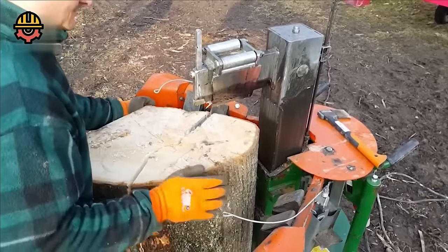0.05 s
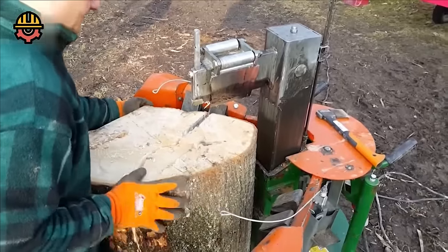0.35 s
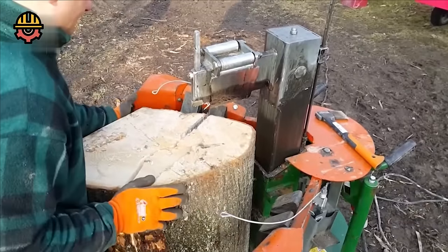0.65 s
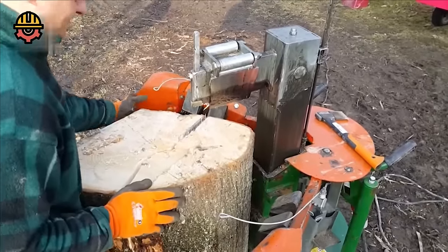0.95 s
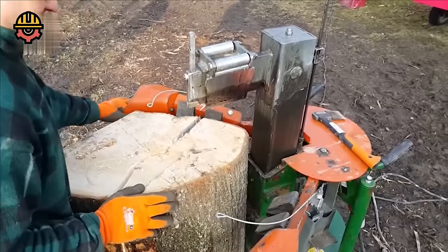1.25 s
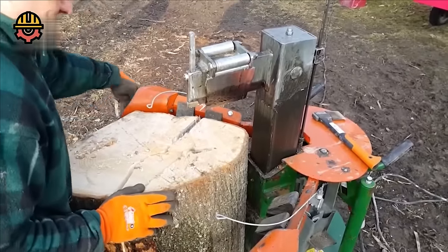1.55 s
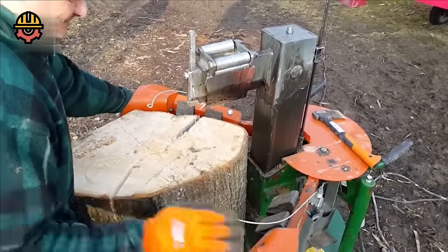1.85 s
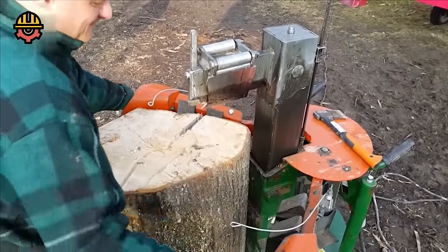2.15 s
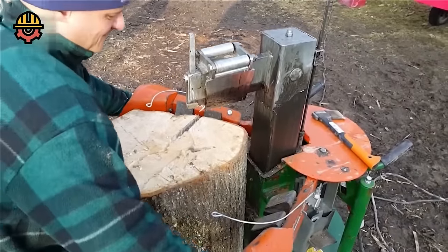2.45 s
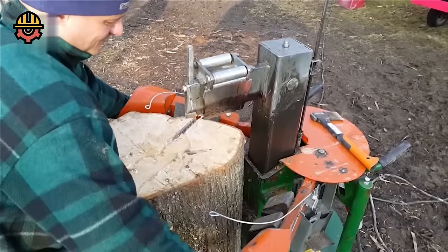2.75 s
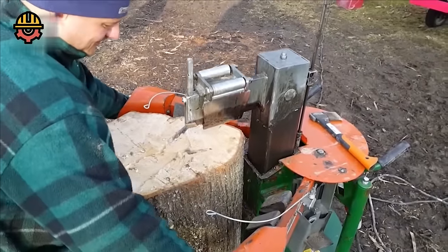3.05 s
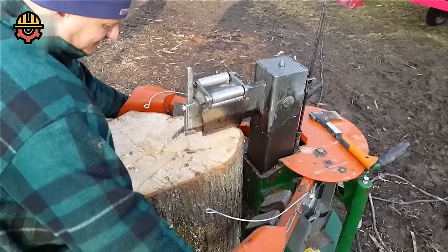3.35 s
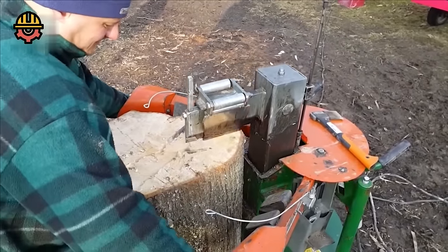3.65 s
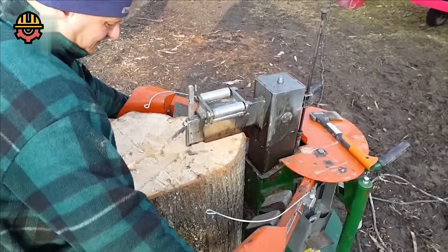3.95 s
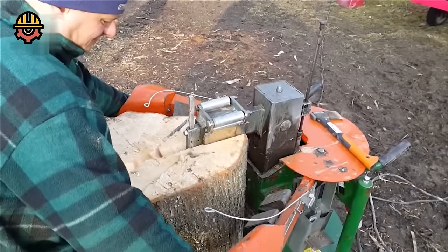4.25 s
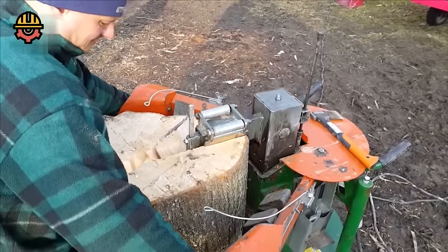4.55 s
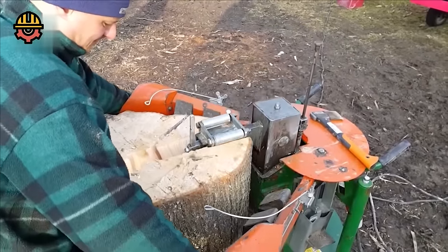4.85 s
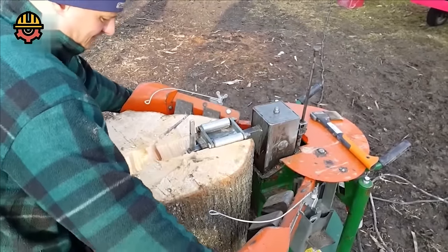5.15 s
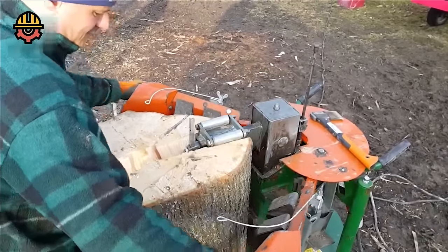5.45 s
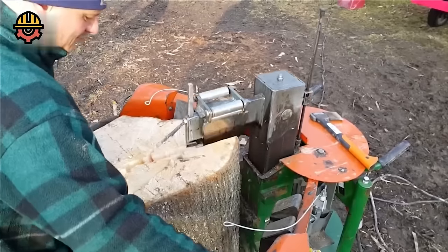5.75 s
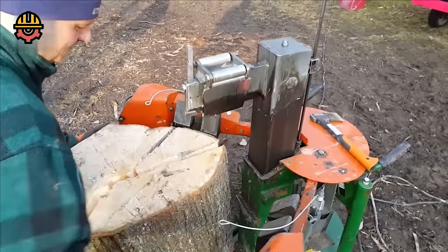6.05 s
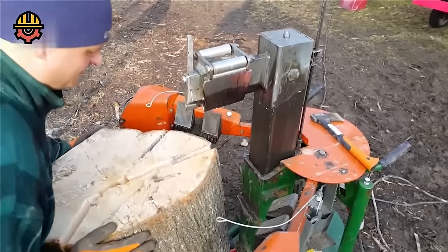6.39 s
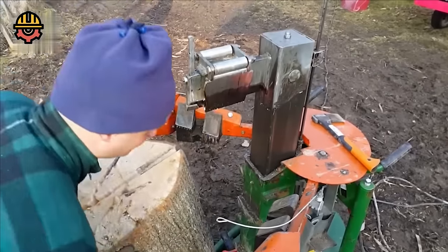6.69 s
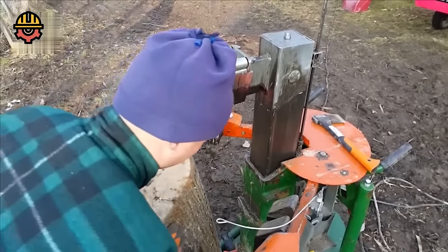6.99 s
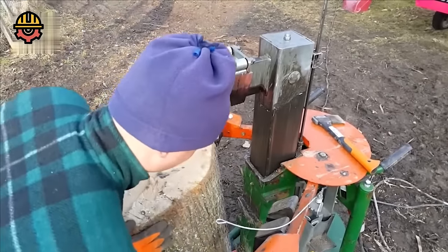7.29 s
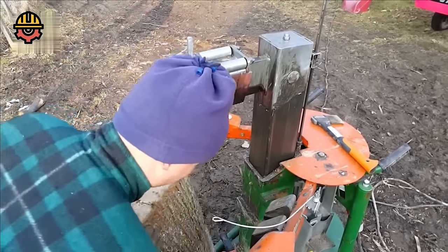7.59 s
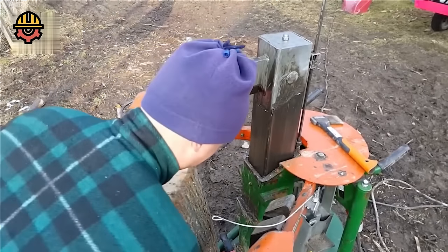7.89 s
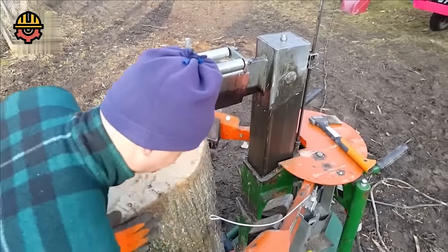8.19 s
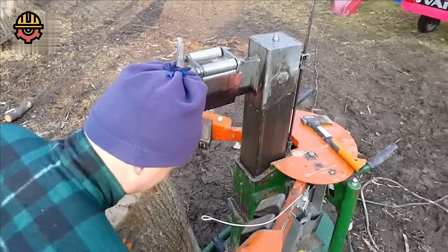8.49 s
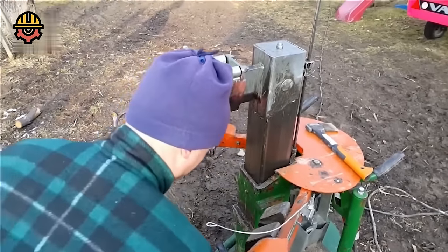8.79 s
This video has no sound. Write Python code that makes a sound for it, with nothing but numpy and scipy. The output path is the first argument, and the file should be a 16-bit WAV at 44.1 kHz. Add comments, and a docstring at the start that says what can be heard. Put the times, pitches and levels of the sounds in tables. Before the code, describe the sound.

A hydraulic log splitter runs close by outdoors, with a steady pump whine, gear rattle, motor hum and hiss of oil. A thin, high whistle fades over the first two seconds, and steel clanks at about 1.2 seconds. At 2.3 seconds the blade bumps onto a big log, which gives a sharp crack at 2.6. At 3.7 a hard clank starts the split: the pump dips in pitch, fibres tear and the wood breaks in a loud, dense run of cracks, strongest around 4 to 4.5 seconds, thinning to single snaps until 5.1. At 5.5 the ram jerks back up with a cluster of clanks, sizzling oil and a cleaner, lower whine. More clanks follow from 6.1 to 6.4. The pump then idles until the end at about 9 seconds, with one light knock at 7.4. There is very little echo.

```python
"""A hydraulic log splitter idles outdoors: its gear pump whines and rattles, its motor hums, its oil hisses.
An oil whistle fades and steel clanks. At 2.3 s the blade bumps onto a big log, which starts to crack.
From 3.7 s the blade forces the log open: the pump slows, fibres tear and the wood cracks apart.
At 5.5 s the ram that pushes the blade jerks back up, with clanks, sizzling oil and a clean, lower whine.
From 6.4 s the pump idles again, with one last knock."""
import sys
import numpy as np
from scipy import signal
from scipy.fft import rfft, irfft, next_fast_len
from scipy.io import wavfile
from scipy.ndimage import uniform_filter1d, map_coordinates

SR = 44100
rng = np.random.default_rng(int(sys.argv[2]) if len(sys.argv) > 2 else 0)


def dump(signal):
    """Clip the signal to [-1, 1] and save it as 16-bit WAV at the path in sys.argv[1]."""
    limited = np.clip(np.atleast_2d(signal).T, -1, 1)
    pcm = np.round(limited * 32767).astype(np.int16)
    wavfile.write(sys.argv[1], SR, pcm)


N = 398223
TOP_HZ = 16000


def amp(db):
    """Turn decibels into a number to multiply by."""
    return 10 ** (np.asarray(db) / 20)


def unit(x):
    """Scale a sound to an average (rms) strength of 1."""
    return x / np.sqrt(np.mean(x ** 2) + 1e-20)


def along(points, hz):
    """Read between the rows of a (frequency, value) table, on a pitch scale."""
    f, values = np.transpose(points)
    return np.interp(np.log(hz + 1), np.log(f + 1), values)


def curves(rows):
    """Join the rows of a timetable with straight lines: one curve per column after the time."""
    times, *columns = np.transpose(rows)
    return [np.interp(np.arange(N) / SR, times, column) for column in columns]


def wobble(rate):
    """A smooth curve through `rate` random points a second."""
    points = rng.standard_normal(int(N * rate / SR) + 4)
    coarse = np.arange(0, N, 64)
    return np.interp(np.arange(N), coarse, map_coordinates(points, [coarse * rate / SR]))


def filtered(x, response):
    """Multiply each frequency in a sound by response(hz)."""
    size = next_fast_len(N + SR // 2)
    return irfft(rfft(x, size) * response(np.fft.rfftfreq(size, 1 / SR)), size)[..., :N]


def coloured(x, colour, size=4096):
    """Give a sound a colour: a table of how strong its low and high frequencies are."""
    gains = amp(along(colour, np.fft.rfftfreq(size, 1 / SR)))
    cepstrum = irfft(np.log(np.maximum(gains, 1e-6)))
    # folding this makes the filter ring after a hit, never before it
    cepstrum[1:size // 2] *= 2
    cepstrum[size // 2 + 1:] = 0
    impulse = irfft(np.exp(rfft(cepstrum)))
    return signal.oaconvolve(x, impulse[None] / np.linalg.norm(impulse), axes=1)[:, :N]


# how alike the two ears are: f/Hz, likeness (1 or more is the same, 0 or less is unrelated)
EAR_LIKENESS = [(60, 3), (130, 1.5), (290, 2.5), (640, 10), (1410, 0.5), (3100, 0.35), (6820, -0.25),
                (15000, -3.8)]
def spread(pair):
    """Two unrelated sounds become left and right: alike in the bass, apart in the treble."""
    angle = lambda hz: np.arccos(np.clip(along(EAR_LIKENESS, hz), 0, 1)) / 2
    mid, side = filtered(pair, lambda hz: np.array([np.cos(angle(hz)), np.sin(angle(hz))]))
    return np.array([mid + side, mid - side])


def rush(colour):
    """Steady stereo noise of strength 1."""
    return unit(spread(coloured(rng.standard_normal((2, N)), colour)))


def add(track, start_s, sound):
    """Mix a sound into a track."""
    part = track[..., round(start_s * SR):][..., :sound.shape[-1]]
    part += sound[..., :part.shape[-1]]


def tone(phase, hz, waver_db, drift):
    """A wavering tone; higher ones flutter faster and differ more between the ears."""
    apart = rng.uniform(-1, 1) * min(hz / 12000, .6)
    start = rng.uniform(-np.pi, np.pi) * min(1, (hz / 1480) ** 2)
    phase = phase + drift * wobble(5 + hz * hz / 3e6) + start
    level = np.sqrt(2) * amp(waver_db * (.2 * wobble(2) + .8 * wobble(11 + hz / 200)))
    return level * np.sin((phase % (2 * np.pi) + np.array([[apart], [-apart]])).astype(np.float32))


# the oil valve's steps: start t/s, end t/s, position, whine's octave level/dB, rattle level/dB
VALVE_STEPS = [(-.2, 2.37, "ready", -39, -42.8), (2.38, 5.12, "down", -45.5, -48.5),
               (5.12, 5.92, "down", -49.5, -54.5), (5.56, 6.29, "up", -48, -74),
               (6.44, 9.3, "rest", -40.5, -48)]
def valve_cycle(switch_s=0.094):
    """The valve glides between positions: each one's share over time, then the octave and rattle gains."""
    t = np.arange(N) / SR
    valve = {name: np.zeros(N) for name in ("ready", "down", "up", "rest")}
    octave, rattle = np.zeros((2, N))
    for start, end, position, octave_db, rattle_db in VALVE_STEPS:
        share = np.clip(.5 + np.minimum(t - start, end - t) / switch_s, 0, 1)
        valve[position] += share
        octave += amp(octave_db) * share
        rattle += amp(rattle_db) * share
    return valve, octave, rattle


# how often the gear teeth meet, less often under load: t/s, f/Hz
TOOTH_RATE = [(0, 448.1), (2.3, 448.1), (2.45, 448.9), (3.7, 448.9), (3.92, 439.6), (4.15, 437),
              (4.35, 447.5), (5.52, 449), (5.72, 432.8), (6.22, 432), (6.42, 448.3)]
TEETH, IDLE_HZ = 12, TOOTH_RATE[0][1]
# the whine's lowest tone: t/s, level/dB
WHINE_LEVEL = [(0, -41.5), (1.2, -41.5), (1.79, -40), (1.85, -47), (1.9, -39), (2.3, -40.5), (2.39, -55),
               (2.47, -45), (2.66, -42), (2.85, -52), (3.6, -43.5), (4.1, -47), (4.4, -45.5), (4.62, -43),
               (4.75, -58), (5.4, -44.5), (5.7, -41.5), (5.9, -43.5), (6.2, -42.5), (6.42, -55), (6.7, -48),
               (7.2, -45), (7.32, -49), (7.5, -45), (7.86, -46), (7.93, -38.5), (8.15, -45), (8.2, -38.5),
               (8.43, -46), (8.5, -40), (8.7, -43), (9.03, -43.5)]
def pump_whine(tooth_phase, tooth_hz, octave_gain, harden_db_per_hz=0.51):
    """Meeting teeth make a tone and its octave (twice as high), which grows as load slows the pump."""
    lowest = amp(curves(WHINE_LEVEL)[0]) * tone(tooth_phase, IDLE_HZ, 1.0, 0.06)
    hardening = amp(harden_db_per_hz * (IDLE_HZ - tooth_hz))
    return lowest + octave_gain * hardening * tone(2 * tooth_phase, 2 * IDLE_HZ, 1.0, 0.067)


# the whine's higher tones: multiple of the tooth rate -> level/dB for ready, down, up, rest
WHINE_OVERTONES = {3: (-7, -12, -10, -10), 4: (-14, -15, -9, -17), 5: (-15, -22, -15, -17),
                   6: (-23, -26, -12, -23), 8: (-22, -25, -11, -22), 9: (-17, -21, -7, -12.5),
                   10: (-21, -21, -15, -19), 11: (-22, -18, -28, -15), 12: (-10, -10, -26, -13),
                   13: (-22, -26, -10, -12), 14: (-19, -14, -26, -19), 15: (-21, -25, -29, -21),
                   17: (-16.5, -21, -30, -16.5)}
def pump_overtones(tooth_phase, valve):
    """The teeth also make higher tones, whose mix changes as the valve switches."""
    sound = np.zeros((2, N))
    for k, levels_db in WHINE_OVERTONES.items():
        level = sum(share * amp(db) for share, db in zip(valve.values(), levels_db))
        sound += level * tone(k * tooth_phase, k * IDLE_HZ, waver_db=1.6, drift=.0018 * k * k)
    return sound


# the rattle's strong tones: multiple of the shaft's turning rate, level/dB for ready, down, rest
RATTLE_TONES = [(9, -15, -17, -10), (10, -29, -26, -12), (22, -12, -16, -6), (23, -25, -21, -10),
                (25, -13, -23, -12), (26, 1, 0, 5), (27, -19, -5, -9), (28, -8, -6, 1), (29, -17, -14, -14),
                (30, -24, -12, -13), (31, -9, -9, -9), (32, -8, -7, -5), (33, -18, -7, -10),
                (34, -10, -6, -5), (35, -23, -9, -28), (38, -17, -10, -12), (40, -20, -8, -17),
                (43, -14, -14, -7), (45, -23, -9, -15), (51, -16, -26, -13), (57, -21, -12, -8),
                (59, -20, -11, -15), (66, -21, -11, -17), (70, -18, -18, -12), (71, -21, -26, -8),
                (74, -19, -19, -13), (75, -21, -21, -12), (77, -3.5, -20, 1.5), (78, -13, -8, -7),
                (79, -19, -18, -11), (80, -15, -11, -13), (85, -16, -15, -11), (87, -15, -9, -11),
                (89, -32, -26, -10), (90, -12, -8, -9), (92, -12, -7, -6), (95, -19, -7, -11),
                (97, -21, -24, -10), (101, -16, -20, -14), (114, -19, -15, -10)]
def gear_rattle(shaft_phase, valve):
    """The gears knock twice a turn, a little unevenly, so odd multiples come a quarter cycle late."""
    sound = np.zeros((2, N))
    for k, ready_db, down_db, rest_db in RATTLE_TONES:
        level = valve["ready"] * amp(ready_db) + valve["down"] * amp(down_db) + valve["rest"] * amp(rest_db)
        phase = k * shaft_phase - k % 2 * np.pi / 2
        sound += level * tone(phase, k * IDLE_HZ / TEETH, waver_db=1.7 + k / 100, drift=.14 + k / 500)
    return sound


# colour of the buzzing gears: f/Hz, level/dB
BUZZ_COLOUR = [(100, -24.5), (300, -13), (420, -25), (500, -23), (620, -37), (740, -10.5), (850, 16),
               (1200, -5), (1600, -7), (2700, -4), (3250, 1.5), (3520, 6), (4500, -15.5), (7600, -8.5),
               (10000, -21), (15000, -22)]
def gear_buzz(shaft_phase, size=8192, count=400):
    """Each turn repeats the same tiny taps; the pattern shifts slowly as the gears wander."""
    multiples = np.arange(count)
    gains = amp(along(BUZZ_COLOUR, multiples * IDLE_HZ / TEETH) - multiples % 2)  # odd ones lose 1 dB
    # leave gaps for the whine and the rattle
    gains[::TEETH] = 0
    gains[[int(row[0]) for row in RATTLE_TONES]] = 0
    place = shaft_phase / (2 * np.pi) % 1 * size
    buzz = np.zeros((2, N))
    for _ in range(3):
        spectrum = rng.standard_normal((2, count)) + 1j * rng.standard_normal((2, count))
        one_turn = irfft(gains * spectrum, size)
        repeated = np.array([np.interp(place, np.arange(size), side) for side in one_turn])
        buzz += repeated * np.cos(wobble(0.668) + rng.uniform(0, np.pi))
    power = np.abs(uniform_filter1d(np.mean(buzz ** 2, 0), SR // 4))
    return unit(spread(buzz / np.sqrt(power + 1e-20)))


# colours of the oil in the valve and of the pump's casing: f/Hz, level/dB
OIL_COLOUR = [(600, -82), (1500, -25), (2700, -23), (3150, -4), (3400, -3), (3620, 3), (3750, -12),
              (4200, -7), (7000, -52), (10000, -70)]
CASING_COLOUR = [(25, -59), (100, -24), (220, -12.5), (330, -5), (470, 1), (520, -6), (580, -14),
                 (650, -5.5), (770, -0.5), (950, 2.5), (1550, -1), (1780, 2.5), (2020, -7), (2230, 1.5),
                 (2600, -3.5), (3700, -1.5), (7800, -6.5), (10000, -18.5), (15500, -35)]
def oil_flow(shaft_phase, dip_hz=580, dip_width_hz=70, dip_db=-6):
    """Oil hisses in the valve and the casing gives off a rushing noise; both throb twice a turn."""
    hiss = amp(0.2 + 1.2 * wobble(25)) * rush(OIL_COLOUR)
    # the casing's noise dips between the whine and its octave
    dip = lambda hz: amp(dip_db * np.exp(-((hz - dip_hz) / dip_width_hz) ** 2))
    casing = amp(0.7) * filtered(rush(CASING_COLOUR), dip)
    throb = 1 + 0.025 * np.cos(2 * shaft_phase)
    return throb * (hiss + casing)


# the fading whistle: t/s, level/dB at 9 times the tooth rate, level/dB at 11 times, hiss level/dB
WHISTLE_LEVELS = [(0, -46.5, -51, -48), (.45, -47.5, -52, -49), (.58, -54, -49, -51), (.83, -53, -50, -51),
                  (.92, -75, -75, -48), (1.4, -90, -90, -53), (1.5, -90, -90, -60), (1.75, -90, -90, -52),
                  (1.9, -90, -90, -68), (2.4, -100, -100, -90)]
# tones that fade with the ninth: multiple of the tooth rate, level/dB compared with the ninth
WHISTLE_PARTNERS = [(3, 3.5), (5, -6), (10, -7)]
# colour of the whistle's hiss: f/Hz, level/dB
WHISTLE_COLOUR = [(1200, -52), (1780, 0), (2000, -18), (2250, -8), (2700, -35), (3800, -40), (4200, -8),
                  (4750, -10), (4920, 0), (5080, -6), (5250, -40), (6000, -72)]
def oil_whistle(tooth_phase):
    """Early on, the oil whistles on some of the pump's overtones, with a narrow hiss."""
    ninth_db, eleventh_db, hiss_db = curves(WHISTLE_LEVELS)
    whistle = amp(ninth_db) * tone(9 * tooth_phase, 9 * IDLE_HZ, 3, .7)
    whistle += amp(eleventh_db) * tone(11 * tooth_phase, 11 * IDLE_HZ, 3, 1.4)
    for k, db in WHISTLE_PARTNERS:
        whistle += amp(ninth_db + db) * tone(k * tooth_phase, k * IDLE_HZ, 2, .3)
    return whistle + amp(hiss_db + 2.9 * wobble(13.2)) * rush(WHISTLE_COLOUR)


# the motor's magnetic tones: f/Hz, level/dB
MOTOR_TONES = [(149, -75.5), (839.5, -55.5), (1919, -59.5), (2125, -64), (2477, -56), (3389, -55.5),
               (3456, -55), (3521, -56), (3589, -55), (3657, -54)]
def motor_hum(drive_db, follow=0.89):
    """Magnetism makes thin tones that swell and sink with the pump's noise, over a faint outdoor rumble."""
    t = np.arange(N) / SR
    hum = sum(amp(db) * tone(2 * np.pi * hz * t, hz, 2.9, 0.23) for hz, db in MOTOR_TONES)
    rumble = amp(-75) * rush([(20, -5.0), (150, -2.0), (400, 0), (2000, -46)])
    return amp(follow * (drive_db - drive_db.mean())) * hum + rumble


def fade(t, db, fade_s, rise_s):
    """The loudness of something struck: it rises quickly, then drops 60 dB every fade_s."""
    return amp(db - 60 * t / fade_s) * (1 - np.exp(-t / rise_s))


def burst(db, fade_s, rise_s, spiky):
    """A dying cluster of tiny taps, in two unrelated versions."""
    t = np.arange(SR // 4) / SR
    noise = rng.standard_normal((2, len(t)))
    sizes = np.exp(spiky * np.repeat(rng.standard_normal(len(t)), 16)[:len(t)])
    shape = fade(t, 0, fade_s, rise_s)
    sound = noise * sizes * shape
    return amp(db) * sound * np.linalg.norm(shape) / np.sqrt(np.sum(sound ** 2) / 2)


# knocks of blade, ram and lever: t/s, steel level/dB, frame level/dB, chatter fade/s, contact f/Hz
KNOCKS = [(1.238, -18.5, -37, 0.051, 750), (1.251, -20, -47, 0.044, 650),
          (2.326, -25.5, -43.5, 0.065, 1300), (3.689, -16, -24.5, 0.05, 3400),
          (3.705, -18.5, -39, 0.12, 3400), (5.516, -27, -28, 0.036, 900), (5.531, -20.5, -24, 0.06, 2300),
          (5.565, -17.5, -33, 0.043, 3800), (5.5869, -13.5, -27, 0.035, 3460),
          (5.609, -20.5, -40, 0.052, 2900), (5.6358, -11.5, -35, 0.05, 2600),
          (5.645, -24, -43, 0.039, 2650), (5.671, -17, -30, 0.034, 3130),
          (6.1213, -19.5, -35.5, 0.085, 2800), (6.224, -28, -44, 0.072, 2500),
          (6.235, -15, -32, 0.052, 3600), (6.258, -20.5, -35.5, 0.12, 3000), (6.294, -14, -40, 0.061, 2700),
          (6.312, -21, -39, 0.11, 2410), (6.396, -27.5, -49, 0.046, 3500), (7.423, -25, -45, 0.04, 1800)]
# notes the blade's arm rings at: f/Hz, level/dB, fade/s
ARM_NOTES = [(1924, -5, 0.044), (2670, -1.5, 0.045), (3010, -4, 0.03), (3477, 1, 0.025), (5450, -13, 0.027),
             (7220, 1, 0.028), (7970, 5, 0.028)]
# frame, oil line and arm ring when the load jumps: t/s, f/Hz, level/dB, fade/s
JOLTS = [(3.705, 169, -30.5, 0.123), (3.704, 332, -11, 0.041), (3.708, 996, -13.5, 0.21),
         (5.533, 1170, -15.5, 0.065), (5.673, 945, -7.5, 0.067)]
# colours of the steel parts and of the frame: f/Hz, level/dB
STEEL_COLOUR = [(530, -21), (900, -2), (1220, -2.5), (1770, -6), (2600, -1), (3040, -7), (3510, -1),
                (3910, -6), (4680, -6), (8150, -10.5), (10000, -19.5), (14000, -28), (16000, -59)]
FRAME_COLOUR = [(25, -50), (70, -30), (140, -15), (210, -9.5), (300, 7.5), (400, 0), (560, -0.5), (800, -2),
                (1200, -4.5), (2000, -11), (4000, -35)]
def steel_clanks(rise_s=0.0021, hard_db=-14, clean_fade_s=0.048):
    """Steel parts chatter against each other, ring the arm, thud through the frame and jolt the oil line."""
    steel, frame, ring = np.zeros((3, 2, N))
    t = np.arange(SR // 3) / SR
    for start, steel_db, frame_db, chatter_s, contact_hz in KNOCKS:
        soften = signal.butter(2, min(4 * contact_hz, TOP_HZ), fs=SR)
        add(steel, start, signal.lfilter(*soften, burst(steel_db, chatter_s, rise_s, spiky=0.047)))
        add(frame, start, burst(frame_db, 3.6 * chatter_s, rise_s, spiky=0.093))
        # only hard, clean blows ring the arm clearly, most of all near the contact's pitch
        ring_db = steel_db + 2 + min(0, steel_db - hard_db) - 19 * np.log2(chatter_s / clean_fade_s)
        for hz, db, fade_s in ARM_NOTES:
            note_db = ring_db + db - 15 * abs(np.log2(hz / contact_hz)) + rng.normal(0, 2.3)
            note = np.sin(2 * np.pi * hz * t + rng.normal(0, 1.0, (2, 1)))
            add(ring, start, fade(t, note_db, fade_s, rise_s) * note)
    for start, hz, db, fade_s in JOLTS:
        add(ring, start, fade(t, db, fade_s, rise_s=0.005) * np.sin(2 * np.pi * hz * t))
    return spread(coloured(steel, STEEL_COLOUR) + coloured(frame, FRAME_COLOUR)) + ring


# how long the echo lasts: f/Hz, fade/s
ECHO_FADES = [(200, 0.18), (2000, 0.22), (10000, 0.049)]
def yard_echo(x):
    """A short, thin echo bounces off the ground and the machine."""
    hz, t, noise = signal.stft(rng.standard_normal((2, SR // 2)), SR, nperseg=256)
    tail = signal.istft(noise * amp(-60 * t / along(ECHO_FADES, hz)[:, None]), SR, nperseg=256)[1]
    delayed = np.pad(x, ((0, 0), (SR // 200, 0)))
    return signal.oaconvolve(delayed, tail / np.linalg.norm(tail[0]), axes=1)[:, :N]


# breaks in the wood: t/s, level/dB, depth/dB (extra level for the thud), sliver f/Hz, slab f/Hz
BREAKS = [(2.327, -35, -8, 5000, 1000), (2.588, -22.5, -2, 3403, 1410), (2.599, -42, 14.5, 3400, 480),
          (3.8331, -32, -15, 7500, 1000), (3.8523, -33, -22.5, 6430, 1000), (3.875, -30, -13, 7040, 1010),
          (3.882, -29.5, -22, 8000, 1000), (3.898, -36, -12, 5500, 1000), (3.9128, -29, -14, 5200, 1000),
          (3.925, -26.5, -9, 5000, 895), (3.967, -22.5, -0.5, 1650, 1210), (3.9749, -26, 0, 1450, 1090),
          (3.987, -25, -8, 4800, 900), (4.015, -18.5, 2, 3200, 760), (4.0243, -20, -1, 3300, 1210),
          (4.0503, -27, 14, 3400, 620), (4.068, -25, 2, 3800, 1010), (4.081, -34.5, 9.5, 4000, 1010),
          (4.1116, -29, 6.5, 5500, 1000), (4.127, -28, 10, 5500, 705), (4.1454, -32, 8, 7000, 650),
          (4.1602, -29, 8.5, 6500, 596), (4.1715, -26.5, 5.5, 6000, 950), (4.1944, -28.5, -12, 4000, 900),
          (4.205, -29, 6, 7100, 945), (4.217, -29, 8.5, 3500, 600), (4.2308, -30, -7, 7500, 950),
          (4.2555, -30, 5.5, 7000, 646), (4.2894, -24.5, 6, 5470, 458), (4.3695, -38, -9, 6000, 700),
          (4.3879, -41, -9, 5500, 700), (4.4184, -20, -2, 5800, 730), (4.424, -24.5, 5, 2000, 480),
          (4.4474, -29, -10, 5500, 700), (4.4734, -23, 1, 3000, 480), (4.5418, -33.5, 6.5, 1300, 520),
          (4.673, -20, -5, 6350, 1000), (4.7242, -33, -4, 6500, 800), (4.8883, -34.5, -4, 6500, 603),
          (4.9583, -40, 2, 7000, 560), (5.014, -30, 3.5, 3200, 706), (5.0184, -32.5, -13, 6300, 700),
          (5.0699, -36.5, 4, 4000, 555)]
# notes the log rings at: f/Hz, level/dB, fade/s
LOG_NOTES = [(307, -10, 0.056), (445, 0.5, 0.057), (604, -6.5, 0.047), (737, -11, 0.03), (952, 0, 0.048),
             (1265, -7, 0.038)]
# colours of a splinter, a snap and the log's body: f/Hz, level/dB
SPLINTER_COLOUR = [(250, -70), (1000, -41), (3000, -24), (5500, 2), (8000, 6), (10000, -7), (15000, -6)]
SNAP_COLOUR = [(90, -24), (530, -14), (900, -9.5), (1550, -5), (2790, -7.5), (3190, -5.5), (5040, -7.5),
               (7680, -9), (9770, -17.5), (13500, -19.5), (16000, -47)]
LOG_COLOUR = [(25, -54), (80, -32), (140, -17.5), (240, -7.5), (330, -2.5), (450, 2), (600, 0), (800, -1),
              (940, 5.5), (1200, -3.5), (2500, -28), (5000, -45)]
def wood_cracks():
    """Wood splinters, a sliver snaps, a freed slab thuds and the log rings; deep cracks splinter less."""
    splinters, snaps, body = np.zeros((3, 2, N))
    ring = np.zeros(N)
    t = np.arange(SR // 4) / SR
    for start, crack_db, depth_db, sliver_hz, slab_hz in BREAKS:
        splinter_db = crack_db + 3 - 0.47 * depth_db
        add(splinters, start, burst(splinter_db, fade_s=0.0082, rise_s=0.000091, spiky=0.22))
        snap = burst(crack_db + 4.5, fade_s=0.032, rise_s=0.00083, spiky=0.34)
        sliver = signal.lfilter(*signal.iirpeak(sliver_hz, Q=4.5, fs=SR), snap)
        add(snaps, start, snap + amp(2) * sliver)
        body_db = crack_db + depth_db
        add(body[0], start, amp([body_db + 7.5]))  # one sharp push starts the thud
        add(body, start, burst(body_db - 1, fade_s=0.024, rise_s=0.00087, spiky=0.15))
        slab = fade(t, body_db + 4, fade_s=0.021, rise_s=0.0011) * np.sin(2 * np.pi * slab_hz * t)
        add(ring, start, slab)
        for hz, db, fade_s in LOG_NOTES:
            # notes far from the slab's pitch ring less
            note_db = body_db + db - 5.5 * abs(np.log2(hz / slab_hz)) + rng.normal(0, 1.4)
            note = np.sin(2 * np.pi * hz * rng.normal(1, 0.0088) * t + rng.uniform(0, 2 * np.pi))
            add(ring, start, fade(t, note_db, fade_s, rise_s=0.0018) * note)
    breaking = coloured(splinters, SPLINTER_COLOUR) + coloured(snaps, SNAP_COLOUR)
    return spread(breaking + coloured(body, LOG_COLOUR)) + ring


def crackle(rate, scatter_db):
    """Random clicks of unequal size, about `rate` a second."""
    sizes = amp(scatter_db * np.minimum(rng.exponential(size=N), 3))
    clicks = rng.random(N) < rate / SR
    return unit(sizes * clicks * rng.standard_normal((2, N)))


# the wood giving way: t/s, fibre level/dB, groan level/dB
TEAR_LEVELS = [(3.76, -90, -101), (3.83, -47, -65), (3.97, -33.5, -43), (4.04, -27.5, -42),
               (4.075, -27.5, -29), (4.14, -25, -35.5), (4.22, -45, -49), (4.35, -42.5, -54),
               (5.08, -57, -65), (5.14, -86, -90)]
# colour of the snapping fibres: f/Hz, level/dB
FIBRE_COLOUR = [(410, -41), (700, 1), (830, -24), (946, -3), (1420, -6), (2330, -5), (3370, -1), (4430, -3),
                (7790, -3), (16000, -17.5)]
def tearing_fibres():
    """The log groans as the blade sinks in; each thickness of fibre snaps in its own range of pitch."""
    fibre_db, groan_db = curves(TEAR_LEVELS)
    edges_hz = np.geomspace(700, TOP_HZ, 6)
    bands = [signal.butter(2, pair, "bandpass", fs=SR, output="sos") for pair in zip(edges_hz, edges_hz[1:])]
    snapping = sum(signal.sosfilt(band, crackle(3000, 1.8)) for band in bands)
    bundles = amp(fibre_db + wobble(130))  # fibres let go in bundles
    fibres = bundles * unit(coloured(snapping, FIBRE_COLOUR))
    groan = amp(groan_db + 1.5) * coloured(crackle(500, 1.6), LOG_COLOUR)
    return spread(fibres + groan)


# colour of the sizzling oil: f/Hz, level/dB
SIZZLE_COLOUR = [(7000, -30), (10500, -8), (12200, 0), (13100, 4), (14400, -5), (16000, -14)]
def oil_sizzle(tooth_phase, valve):
    """While the ram goes up, the oil sizzles with a flickering hiss and very high pump overtones."""
    sheen = np.zeros((2, N))
    for k in range(25, 34):
        level = amp(-23 + along(SIZZLE_COLOUR, k * IDLE_HZ))
        sheen += level * tone(k * tooth_phase, k * IDLE_HZ, waver_db=3.5, drift=1.3)
    hiss = amp(-13 + 1.5 * wobble(30)) * rush(SIZZLE_COLOUR)
    return valve["up"] * (sheen + hiss)


# the running pump's noise, quietest with the blade deep in the log: t/s, level/dB
DRIVE_LEVEL = [(0, -41.5), (.7, -41.5), (2.2, -43.5), (2.6, -43.5), (4.1, -42.5), (4.65, -54.5),
               (5.05, -48.5), (5.4, -50), (5.7, -46.5), (6.1, -45.5), (6.4, -42.5), (7.7, -40),
               (9.03, -41.5)]
def scene():
    """Wood and steel sound over the motor and the pump, whose sounds all follow one turning shaft."""
    tooth_hz, = curves(TOOTH_RATE)
    drive_db, = curves(DRIVE_LEVEL)
    valve, octave_gain, rattle_gain = valve_cycle()
    tooth_phase = 2 * np.pi * np.cumsum(tooth_hz) / SR
    shaft_phase = tooth_phase / TEETH
    pump = pump_whine(tooth_phase, tooth_hz, octave_gain)
    pump += amp(drive_db) * (pump_overtones(tooth_phase, valve) + oil_sizzle(tooth_phase, valve))
    pump += oil_whistle(tooth_phase) + rattle_gain * gear_rattle(shaft_phase, valve)
    # on the way up, the load presses the teeth together and calms the buzz
    buzz = (1 - 0.31 * valve["up"]) * amp(1.3) * gear_buzz(shaft_phase)
    pump += amp(drive_db) * (buzz + oil_flow(shaft_phase))
    # the machine's low tones reach the right ear a moment earlier
    lag = lambda hz: np.pi * np.minimum(hz, 2000) * .00005
    machine = filtered(pump + motor_hum(drive_db), lambda hz: np.exp(1j * lag(hz) * np.array([[-1], [1]])))
    # the splitting sounds carry no deep bass
    bass_cut = signal.butter(2, 110, "highpass", fs=SR, output="sos")
    splitting = signal.sosfilt(bass_cut, steel_clanks() + wood_cracks() + tearing_fibres())
    return machine + splitting + amp(-15.5) * yard_echo(splitting)


# how much louder the left side is than the right: f/Hz, level/dB
LEFT_BOOST = [(60, 0.5), (130, 3.2), (290, 3), (640, 0.27), (1410, 2), (3100, 2.9), (6820, 0.054),
              (15000, 10.4)]
def record(dry):
    """The sound leans to the left, and everything above TOP_HZ is cut."""
    lean = lambda hz: amp(along(LEFT_BOOST, hz) * np.array([[.5], [-.5]]))
    return filtered(dry, lambda hz: lean(hz) * (hz < TOP_HZ))


dry = scene()
out = record(dry)
dump(out)
```